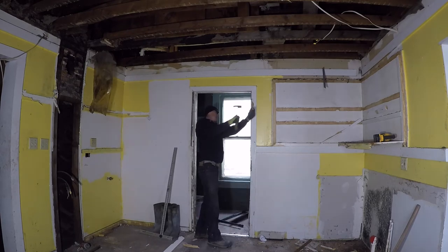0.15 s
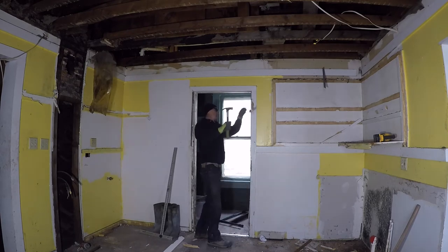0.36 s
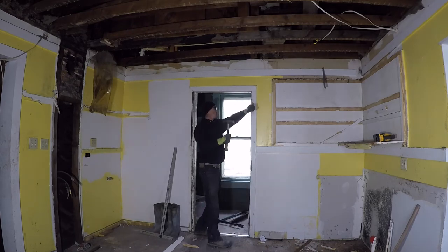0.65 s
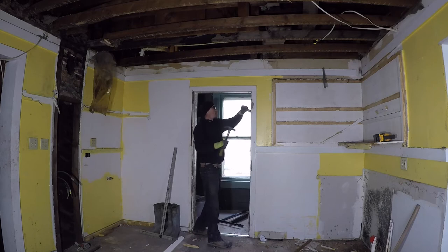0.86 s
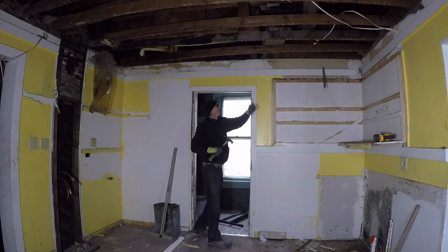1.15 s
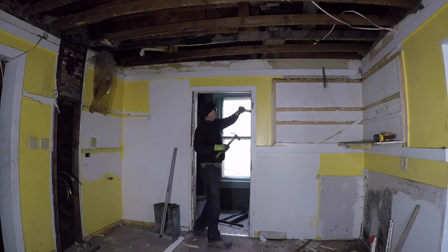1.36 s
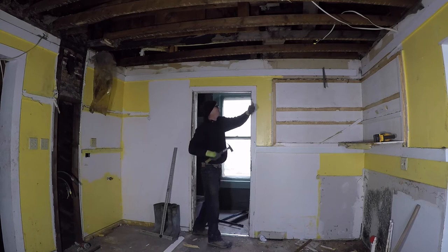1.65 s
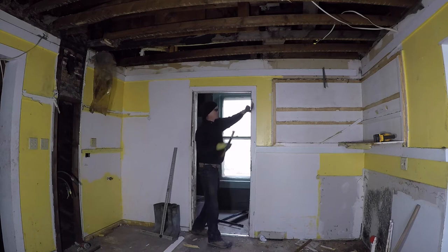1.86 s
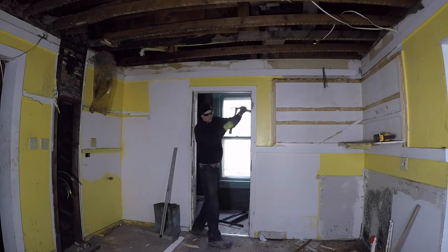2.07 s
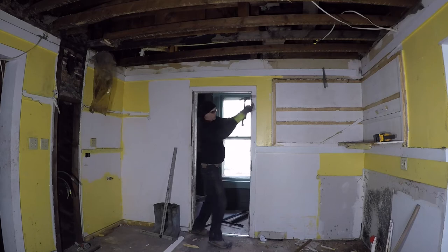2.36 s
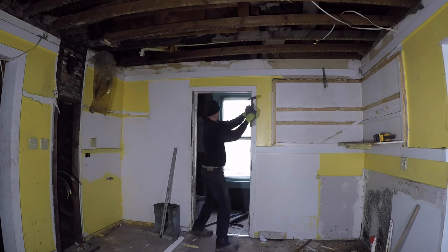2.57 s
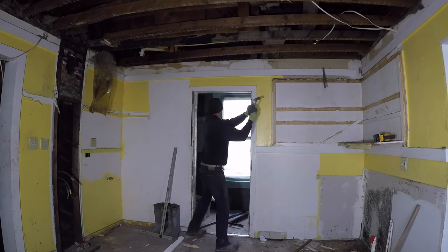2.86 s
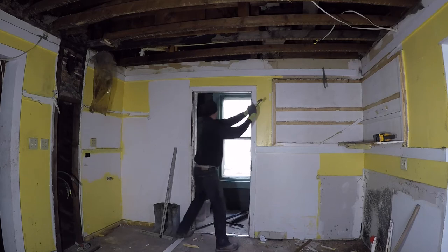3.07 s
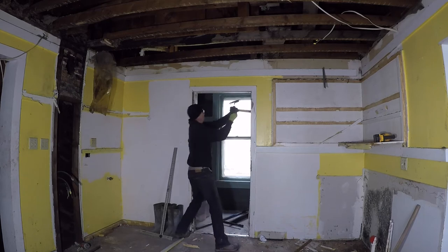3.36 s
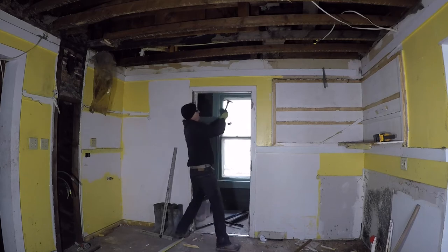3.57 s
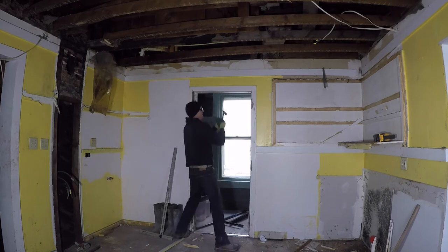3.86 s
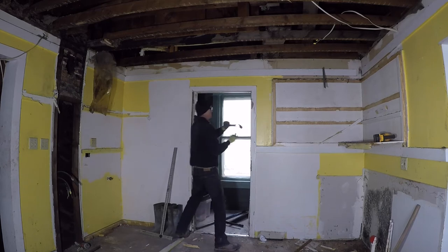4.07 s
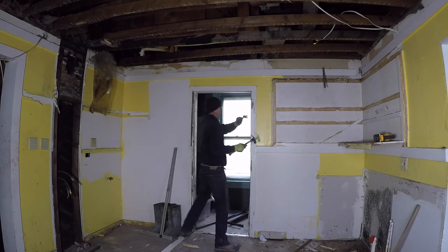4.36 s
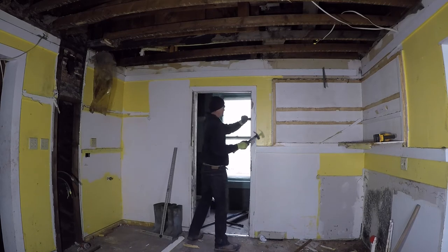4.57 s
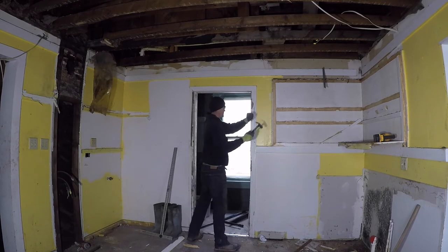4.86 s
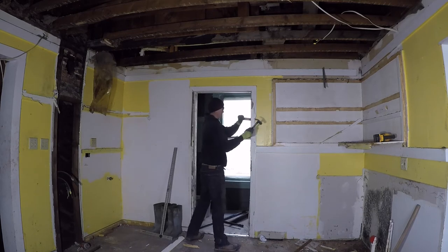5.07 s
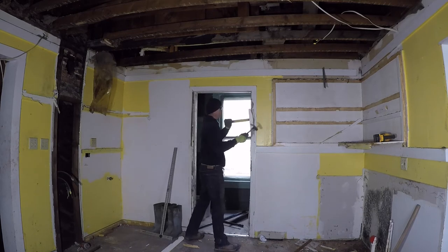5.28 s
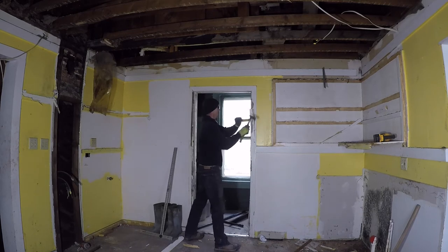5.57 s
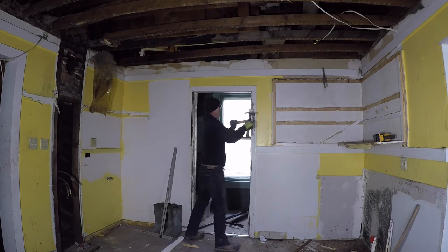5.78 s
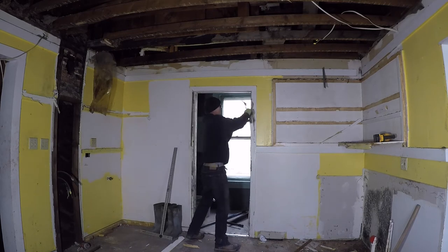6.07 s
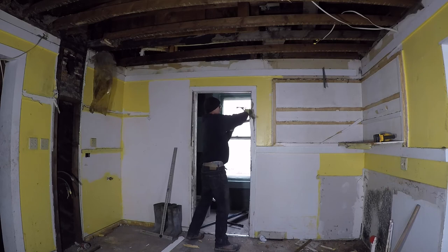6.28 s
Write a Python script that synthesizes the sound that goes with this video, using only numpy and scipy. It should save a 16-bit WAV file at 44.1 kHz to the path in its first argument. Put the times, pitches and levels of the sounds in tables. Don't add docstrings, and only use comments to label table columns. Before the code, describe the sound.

Indoors in an empty stripped room, a hammer strikes a steel bar once, bright and ringing, quickly choked. Sparse wooden knocks and scrapes follow, then a very loud splitting crack as trim gives way. Quieter bumps and small squeaks lead to a second cluster of cracks, then faint taps. Low floor thumps and gritty shuffles run underneath. The microphone stands across the room, catching short hard reverberation over quiet house hush.

```python
import sys
import numpy as np
from scipy import signal
from scipy.fft import rfft, irfft, next_fast_len
from scipy.io import wavfile
from scipy.ndimage import uniform_filter1d

SR = 44100
rng = np.random.default_rng(int(sys.argv[2]) if len(sys.argv) > 2 else 0)


def to_linear_factor(level_db):
    exponent = np.asarray(level_db, float) / 20
    return 10 ** exponent


def to_wav(sig):
    pcm = np.clip(np.atleast_2d(sig), -1, 1) * 32767
    pcm = np.round(pcm).astype(np.int16)
    wavfile.write(sys.argv[1], SR, pcm.T)


N = 283563


def walk(rate_hz, size=N):
    hold = int(SR / rate_hz)
    held = np.repeat(rng.standard_normal(size // hold + 1), hold)
    return 1.3 * uniform_filter1d(uniform_filter1d(held, hold), hold)[:size]


def fade(x, tau_s):
    return signal.lfilter([1], [1, -np.exp(-1 / (max(tau_s, 1e-4) * SR))], x)


def swells(s, db, t60_s, rise_db_s):
    step = 64
    late_s = np.arange(0, N + step, step) / SR - np.array(s)[:, None]
    fall_db = np.maximum(-rise_db_s * late_s, 60 * late_s / np.array(t60_s)[:, None])
    power = np.sum(to_linear_factor(np.array(db)[:, None] - fall_db) ** 2, axis=0)
    return np.interp(np.arange(N) / step, np.arange(late_s.shape[1]), np.sqrt(power))


def body(x, modes):
    hz = np.arange(1, 4098) * SR / 8192
    power = 0
    for f_hz, width_hz, db in modes:
        detune = (hz - f_hz * f_hz / hz) / width_hz
        power = power + to_linear_factor(db) ** 2 / (1 + detune ** 2) ** 1.42
    cepstrum = irfft(np.log(power) / 2)
    cepstrum[1:4096] *= 2
    cepstrum[4097:] = 0
    response = irfft(np.exp(rfft(cepstrum)))
    return signal.oaconvolve(x, response / np.sqrt(np.sum(response ** 2)))[:len(x)]


def add_mode(out, start_s, hz, db, t60_s, rough, waver_hz):
    part = out[int(start_s * SR):][:SR]
    t = np.arange(len(part)) / SR
    waver = 1 + rough * (walk(waver_hz, size=len(t)) + 1j * walk(waver_hz, size=len(t)))
    waver *= 1 - np.exp(-t * hz / 2)
    part += to_linear_factor(db - 60 * t / t60_s) * np.imag(waver * np.exp(2j * np.pi * hz * t))


def zones(size):
    # [f/Hz, t60/s]
    room_t60 = [(100, 0.29), (500, 0.43), (1000, 0.44), (3000, 0.37), (6000, 0.31), (10000, 0.22),
                (15000, 0.2)]
    noise = rfft(rng.standard_normal(size))
    log_hz = np.log(np.arange(size // 2 + 1) * SR / size + 1)
    at = np.log(np.array(room_t60)[:, 0])
    return [(irfft(noise * np.interp(log_hz, at, one), size), t60_s)
            for one, (_, t60_s) in zip(np.eye(len(at)), room_t60)]


def room():
    t = np.arange(SR) / SR
    return sum(z * to_linear_factor(-60 * t / t60_s) for z, t60_s in zones(size=SR))


def decay(power, t60_s):
    tau_s = t60_s / np.log(1e6)
    return np.sqrt(fade(power, tau_s) + to_linear_factor(-14.5) ** 2 * fade(power, 2.284 * tau_s))


def hush():
    # [f/Hz, density/dB]
    hush_bands = [(40, -3), (100, -5), (192, -9.5), (360, -6.5), (1000, -11.5), (2460, -18.5),
                  (8180, -24.5), (15400, -29)]
    level_db, whine_hz, whine_db = -62.5, 8650, -82
    size = next_fast_len(N)
    log_hz = np.log(np.arange(size // 2 + 1) * SR / size + 1)
    at_hz, db = np.transpose(hush_bands)
    shape = to_linear_factor(np.interp(log_hz, np.log(at_hz), db, -90, -90))
    noise = irfft(rfft(rng.standard_normal(size)) * shape, size)[:N]
    noise *= to_linear_factor(level_db) / np.sqrt(np.mean(noise ** 2))
    whine = to_linear_factor(whine_db) * np.sin(2 * np.pi * whine_hz * np.arange(N) / SR)
    return noise * to_linear_factor(0.73 * walk(0.85)) + whine


def joists():
    # [t/s, level/dB, f/Hz, t60/s]
    weight_shifts = [(.09, -26.5, 35.6, 0.49), (.36, -48, 29, 0.91), (.77, -39, 30.5, 0.88),
                     (.86, -40.5, 29.9, 1.7), (1.11, -41.5, 30.26, 0.64), (1.31, -41.5, 27.9, 1.1),
                     (1.41, -24.5, 27.5, 0.22), (1.5, -35.5, 31, 1.1), (1.95, -26, 29.5, 0.6),
                     (2.42, -35.5, 32.97, 0.26), (2.56, -31, 38.4, 1.4), (2.99, -47.5, 42.5, 1.9),
                     (3.15, -44, 35, 1.1), (3.26, -36.5, 34.7, 0.93), (3.38, -26.5, 35.3, 1.3),
                     (3.92, -37, 28.36, 0.48), (4.1, -48.5, 29.5, 0.27), (4.19, -37.5, 35, 0.98),
                     (4.29, -33, 33.6, .15), (4.409, -33.5, 35.8, 0.22), (4.53, -26.5, 32.9, 0.38),
                     (4.64, -23, 33.1, 0.6), (4.98, -32.5, 33.34, 1.35), (5.34, -30.5, 32.7, 0.42),
                     (5.6, -24, 31.74, .9), (5.66, -22.5, 31, 0.34), (5.78, -24, 31.7, 0.18),
                     (5.85, -36, 30.96, 0.63), (6.16, -48, 26.94, .4), (6.321, -49, 25.5, 0.87)]
    s, db, hz, t60_s = np.transpose(weight_shifts)
    hz = np.interp(np.arange(N) / SR, s, hz)
    lurch = .95 + 0.63 * (walk(50) + 1j * walk(50))
    swing = np.imag(lurch * np.exp(2j * np.pi * np.cumsum(hz) / SR))
    return np.sqrt(2) * swells(s, db, t60_s, rise_db_s=241) * swing


def floorboards():
    # [t/s, level/dB, t60/s]
    footfalls = [(.045, -29, .5), (0.569, -51.5, 1.14), (0.75, -32.5, 0.31), (.81, -53.5, 2),
                 (1.27, -43, 1.3), (1.56, -53.5, 1.7), (1.929, -45, 1.27), (2.26, -49.5, 1.87),
                 (2.46, -49, 0.33), (2.541, -17, 0.22), (2.61, -33.5, 0.44), (2.74, -50.5, 1.2),
                 (3.11, -39, 0.56), (3.28, -33.5, 0.17), (3.35, -12, 0.35), (3.449, -27, 0.65),
                 (3.929, -42, 0.43), (4.21, -38.5, 1.1), (4.28, -32.5, 0.42), (4.491, -31.5, 1),
                 (4.71, -38.5, 2.1), (4.989, -31.5, 0.54), (5.17, -32.5, 1.27), (5.28, -21, 0.3),
                 (5.399, -37, 0.55), (5.59, -38, 0.45), (5.71, -41, 0.94), (6.119, -59.5, 2.4),
                 (6.43, -33, 0.33)]
    band = signal.butter(2, (36, 100), "bandpass", fs=SR, output="sos")
    rumble = signal.sosfilt(band, rng.standard_normal(N))
    rumble = rumble / np.sqrt(uniform_filter1d(rumble ** 2, SR // 20))
    return rumble * swells(*np.transpose(footfalls), rise_db_s=448)


def grit():
    # [t/s, level/dB, t60/s]
    shuffles = [(0.089, -31.5, 0.8), (.91, -53.5, .45), (1.36, -54.5, 0.72), (1.7, -61.5, 3.8),
                (2.298, -62, 4.5), (2.699, -58.5, 1.8), (3.099, -71.5, 2.86), (3.469, -64, 1.2),
                (3.96, -54, 4.2), (4.301, -59, 4.4), (4.57, -56.5, 1.2), (5.009, -59.5, 1.48),
                (5.28, -25, 0.62), (5.65, -54, 2.95), (5.96, -56.5, 2.3)]
    grains = rng.standard_normal(N) * (rng.random(N) < .02) * to_linear_factor(3.9 * rng.exponential(size=N))
    rustle = body(grains, [(795, 120, 13.0), (2700, 2000, 5.5), (6300, 3600, -12.5), (12000, 2000, -28.0)])
    return rustle / np.std(grains) * swells(*np.transpose(shuffles), rise_db_s=109) * to_linear_factor(-36.5)


def pings():
    # [t/s, level/dB, f/Hz, t60/s]
    clean_rings = [(.016, -20, 6848, 0.15), (.036, -27, 6848, 0.11), (.075, -34, 6848, 0.21),
                   (2.275, -45, 336, 0.18), (2.285, -57.5, 795, .12), (2.44, -58, 1210, 0.11),
                   (2.452, -55, 870, .1), (2.51, -49, 2920, 0.23), (2.53, -46, 1460, 0.17),
                   (3.3062, -14, 2270, .03), (3.331, -13, 3220, 0.056), (3.345, -20, 3820, .07),
                   (3.427, -20.5, 2626, 0.13), (3.44, -29.5, 565, 0.34), (4.48, -28, 677, .12),
                   (4.583, -48, 740, .12), (4.606, -34, 726, .15), (4.682, -44, 736, .15),
                   (4.739, -46, 717, 0.14), (4.793, -46, 708, .15), (4.79, -59.5, 3074, 0.12),
                   (5.152, -28, 5030, .08), (5.209, -24, 3000, .06), (5.264, -20, 2600, .06),
                   (3.34, -22, 400, .15), (5.27, -22, 797, .15), (4.103, -48, 1890, .12),
                   (4.19, -62, 1890, .8), (5.215, -26, 4000, .1), (5.216, -28, 5300, .1),
                   (5.28, -28, 140, .3)]
    # [t/s, level/dB, f/Hz, t60/s]
    squeaks = [(4.567, -46, 3500, .1), (4.59, -51, 3480, .1), (4.59, -54, 4060, .14), (4.61, -49, 3450, .1),
               (4.66, -60, 3500, .12), (4.682, -60, 3500, .1), (5.608, -51, 4770, .25),
               (5.752, -64, 4830, .3), (4.112, -58, 3300, .15), (4.135, -62, 3350, .2),
               (3.94, -61, 3900, .2)]
    # [t/s, level/dB, f/Hz, t60/s, waver/Hz]
    rough_bands = [(.03, -41, 800, .8, 400), (.05, -46, 1280, .9, 400), (.05, -47, 587, .7, 200),
                   (.03, -47, 2600, .8, 500), (.05, -54, 1900, .8, 1000), (.015, -42, 4000, .6, 700),
                   (.015, -47, 5600, .6, 1200), (.826, -52, 1670, .6, 500), (.826, -50, 3150, .5, 800),
                   (.826, -54, 1310, .5, 300), (.826, -53, 2280, .4, 600), (.69, -70, 1800, .3, 1500),
                   (1.945, -49, 2380, .4, 500), (1.945, -53, 2860, .4, 400), (3.105, -64, 2800, .6, 500),
                   (3.125, -65, 3240, .5, 500), (3.135, -50, 180, .3, 60), (3.335, -30, 140, .45, 50),
                   (4.11, -66, 2900, .4, 500), (4.14, -60, 1890, .12, 150), (4.365, -68, 1900, .3, 400),
                   (4.487, -65, 9600, .25, 2000), (4.487, -66, 8100, .2, 1500), (4.49, -63, 5200, .2, 600),
                   (4.567, -60, 2600, .2, 800), (5.13, -31, 900, .25, 500), (5.165, -34, 900, .2, 500),
                   (5.3, -48, 5300, .5, 2000), (5.33, -36, 850, .5, 500), (5.546, -50, 6900, .2, 1500),
                   (5.546, -43, 3000, .35, 900), (5.6, -72, 9500, 1, 6000), (5.82, -64, 13000, .1, 6000),
                   (5.9, -69, 6700, .3, 1800), (5.96, -79, 13300, .25, 2500), (.45, -66, 160, .5, 60),
                   (5.75, -55, 220, .4, 80), (5.13, -35, 140, .4, 50), (3.34, -30, 380, .3, 150),
                   (3.34, -30, 4300, .3, 2000)]
    out = np.zeros(N)
    for s, db, hz, t60_s in clean_rings:
        add_mode(out, s, hz, db, t60_s, rough=.5, waver_hz=89.5)
    for s, db, hz, t60_s in squeaks:
        add_mode(out, s, hz, db, t60_s, rough=1, waver_hz=260)
    for s, db, hz, t60_s, waver_hz in rough_bands:
        add_mode(out, s, hz, db - 19, t60_s, rough=20, waver_hz=waver_hz)
    return out


def rings():
    # [f/Hz, level/dB, t60/s]
    bar_modes = [(2110, -15, .3), (2649, -14, .35), (2982, -13, .7), (4102, -13, .75), (4468, -19, .6),
                 (4667, -19, .6), (5068, -13, .7), (5233, -17, .75), (5351, -15, .65), (5469, -14, .4),
                 (5803, -22, .6), (6848, -8, .66), (6885, -8, .45), (6802, -11, .5), (8016, -17, .45),
                 (8812, -22, .45), (10570, -21, .4), (11570, -21, .22), (12020, -24, .62), (14550, -26, .3)]
    # [t/s, level/dB, f/Hz, t60/s]
    ticks = [(.742, -43.5, 900, 0.5), (.826, -40.5, 952, 0.52), (.826, -41, 2960, 0.37),
             (1.362, -37.5, 893, 0.6), (1.362, -34.5, 2437, 0.19), (1.362, -43, 5320, 0.24),
             (1.945, -38, 960, 0.4), (1.95, -48, 3950, 0.27), (1.95, -55, 4960, 0.2),
             (2.278, -48, 320, 0.33), (2.278, -63, 428, 0.3), (.014, -30.5, 160.2, 0.33),
             (2.506, -27, 97.8, 0.49), (3.335, -27, 76.4, 0.29), (3.934, -58, 2400, 0.34),
             (4.106, -61, 1877, 0.39), (4.11, -62, 3206, 0.45), (4.366, -58, 5100, 0.15),
             (4.472, -32.5, 643, 0.23), (4.53, -61, 5350, 0.35), (4.582, -41.5, 746.6, 0.51),
             (3.345, -26.5, 261.4, 0.21), (4.685, -45.5, 724, 0.67), (4.69, -43.5, 335.2, 0.59),
             (5.548, -33, 817, 0.25), (6.146, -64, 5070, 0.3), (6.412, -47, 8660, 0.14),
             (6.412, -47.5, 2290, .2), (4.366, -60, 8700, .3), (6.144, -58, 8100, .3),
             (6.146, -65, 11500, 0.24)]
    strike_s, bar_db = 0.011, -27
    grip_db, grip_share = 11.5, 0.43
    out = np.zeros(N)
    for hz, db, t60_s in bar_modes:
        add_mode(out, strike_s, hz, bar_db + db, t60_s, rough=2.0, waver_hz=220)
        add_mode(out, strike_s, hz, bar_db + grip_db + db, grip_share * t60_s, rough=.8, waver_hz=120)
    for s, db, hz, t60_s in ticks:
        waver_hz = min(hz / 3, 500) if hz < 8000 else 5000
        add_mode(out, s, hz, db, t60_s, rough=2.0, waver_hz=waver_hz)
    return out


def blows():
    # [t/s, crack/dB, splinters over crack/dB, boards over crack/dB]
    thuds = [(.0084, -19.5, -12, -19.5), (0.0135, -18, -2, -6.5), (.8701, -39, -5, -7),
             (1.261, -77, -7, 16), (1.694, -73, -7, 20.5), (3.096, -47.5, -20, 0), (3.3402, -29, -23, 7.5),
             (4.106, -45, -12, -14.5), (4.1694, -54.5, -2.5, -2), (4.266, -64, 4, 17), (4.285, -66, 4, 18),
             (4.467, -42, -8, 9), (4.475, -46, -9, 6), (4.488, -43, -3, 6), (4.51, -48, -2, 4),
             (4.55, -52, 0, 3), (4.567, -50, -6, 0), (4.5286, -41, -12.5, -14), (4.582, -49, -12, 11),
             (4.6814, -62, -20, 20), (4.748, -57, -15, 5), (4.9389, -54, -24, 16), (4.969, -46, -6, 2),
             (5.102, -25.5, -4.5, -9.5), (5.128, -12, -8.5, -14), (5.136, -18, -6, -10),
             (5.588, -64.5, -2, 24.5), (5.75, -62, -24, 18)]
    taps = [(.023, -27.5, -14, -1), (0.6802, -69.5, -14, 11.5), (0.7403, -35, -16, 4),
            (1.0194, -47, -19, -4), (1.359, -22.5, -9, -13.5), (1.373, -35, 4, 4),
            (1.9396, -21, -12.5, -27), (1.9645, -33, 2, -1.5), (2.279, -71, 1, 14), (2.518, -39, -14.5, 1),
            (1.905, -49, -8, 0), (3.935, -49.5, -2, -9), (5.5449, -31, -26, 11), (5.82, -50, -3, -13),
            (5.828, -52, 0, -13), (5.549, -40, -14, 7), (5.575, -42, -10, 9)]
    splits = [(0.8247, -16, -16.5, -6.5), (2.5016, -42, -27, 11), (3.3313, -0.2, -10.5, -6),
              (3.416, -6, -9.5, -10.5), (3.4494, -43, -1, -1), (4.2403, -46, -1, 3), (4.255, -52, 5, 5),
              (4.3671, -57, 7, -10.5), (5.1502, -31, 21, 20), (5.1904, -11, -7.5, -5),
              (5.208, -7, -3.5, -6.5), (5.2338, -35, 11.5, 7), (5.2638, -11, -10, 0), (5.298, -20, -12, 3),
              (6.142, -64, 16.5, -1.5)]
    dry_splits = [(3.3032, -9, -5.5, -16), (3.3053, -2, -6.5, -13.5), (3.3288, -7, -14.5, -6),
                  (3.346, -12, -13.5, -0.5), (5.176, -14, -4, -3), (5.272, -12, -11, -3),
                  (0.0248, -15, -6, -2), (0.04, -21, -2.5, 2), (6.413, -30, -7.5, 8), (5.1297, -14, -6, -4),
                  (5.215, -14, -3, -8), (5.238, -21, -4, -6), (5.286, -18, -8, -2), (5.317, -22, -8, 0),
                  (4.364, -58, 3, -5)]
    scuffs = [(.727, -29.5, -11.5, -4.5), (1.349, -24.5, -8.5, -6), (2.432, -59.5, -6, 7),
              (2.504, -33.5, -13.5, 1.5), (3.1, -40.5, -18, -7), (3.123, -42, -16.5, -8.5),
              (1.225, -57, -6, -10), (1.795, -53.5, -8, -10), (1.903, -44, -7, -1), (2.68, -60, 4, 6.5),
              (2.737, -45.5, -5, -15.5), (2.843, -53, -5.5, -13), (3.24, -62, 8, -5),
              (3.252, -48, -7.5, -2), (3.275, -50, 3, -5), (.765, -50, 5, -5), (.855, -52, 5, -5),
              (3.77, -45, -30, -14), (3.895, -60.5, -2, 2), (4.975, -42, -8.5, 5), (5.8, -54, 0, -8),
              (5.813, -47, -10, -10), (5.9, -61.5, 9, -5), (5.96, -59.5, 3, -5)]
    # [wall over boards/dB, snap over echo/dB, rub/s]
    kinds = [
        (4, -1.5, 0),
        (-10, -1, 0),
        (-6.5, 6.5, 0),
        (-10, 12.5, 0),
        (-10, -30, 0.0072),
    ]
    # [f/Hz, width/Hz, level/dB]
    crack_modes = [(1835, 670, -4), (2400, 650, 1), (2993, 800, 2), (3870, 310, -5.5)]
    splinter_modes = [(4840, 2000, 3.5), (6530, 3400, -1), (9900, 1600, -8), (13800, 3600, -12.5)]
    board_modes = [(614, 89, -1), (803, 320, 3), (960, 130, -6.5), (1267, 370, -4)]
    wall_modes = [(131, 20, 1), (247, 50, -2), (324, 120, -3), (407, 180, -5)]
    rise_s, snap_s, build_s = 0.00039, 0.0036, 0.0015

    rows = []
    for table, kind in zip((thuds, taps, splits, dry_splits, scuffs), kinds):
        rows += [(*row, *kind) for row in table]
    s, crack_db, bright_db, deep_db, wall_db, snap_db, rub_s = np.transpose(rows)
    at = (s * SR).astype(int)
    hard = rub_s == 0
    swell_s = rub_s.max()
    # level/dB, modes, trim/dB, slowness
    bodies = [(crack_db, crack_modes, -10, 1.2),
              (crack_db + bright_db, splinter_modes, -3.5, 0.42),
              (crack_db + deep_db, board_modes, -3.5, 0.82),
              (crack_db + deep_db + wall_db, wall_modes, -5.5, 3.5)]

    grain = rng.standard_normal(N) * to_linear_factor(3.3 * rng.standard_normal(N)) * 0.66
    noise = zones(size=next_fast_len(N))
    out = 0
    for db, modes, trim_db, slow in bodies:
        echo, rub, snap = np.zeros((3, N))
        echo[at[hard]] = to_linear_factor(db + trim_db - snap_db)[hard] ** 2
        snap[at[hard]] = to_linear_factor(db + trim_db)[hard] ** 2
        rub[at[~hard]] = to_linear_factor(db + trim_db)[~hard] ** 2
        echo = echo + fade(fade(rub, swell_s), swell_s) / (swell_s * SR) ** 2
        built = fade(echo, build_s * slow) / (build_s * slow * SR)
        tail = sum(z[:N] * decay(built, t60_s) for z, t60_s in noise)
        sharp = fade(fade(snap, rise_s) / (rise_s * SR), snap_s * slow)
        out = out + body(tail + grain * np.sqrt(sharp), modes)
        noise = [(np.roll(z, SR), t60_s) for z, t60_s in noise]
        grain = np.roll(grain, SR)
    return out


def scene():
    duck_db, duck_at_db, duck_back_s = -13.5, -34.5, .17
    floor = signal.fftconvolve(grit(), room())[:N] + joists() + floorboards()
    work = blows() + rings() + pings()
    loud = fade(work ** 2, duck_back_s) / (duck_back_s * SR)
    duck = to_linear_factor(duck_db * loud / (loud + to_linear_factor(duck_at_db) ** 2))
    return (work + floor + duck * hush())[None]


def roll_off(x):
    return signal.sosfilt(signal.butter(12, 16500, fs=SR, output="sos"), x)


def record(dry):
    limit, knee, top_hz = .5, 4, 15400
    limited = 0.75 * dry / (1 + np.abs(0.63 * dry / limit) ** knee) ** (1 / knee)
    low_pass = signal.ellip(12, .2, 70, top_hz, fs=SR, output="sos")
    return roll_off(signal.sosfilt(low_pass, limited))


dry = scene()
out = record(dry)
to_wav(out)
```